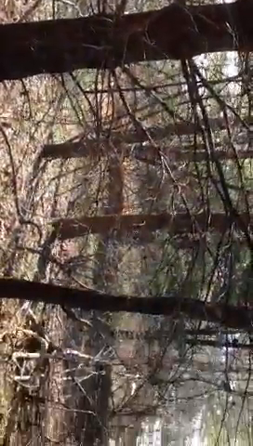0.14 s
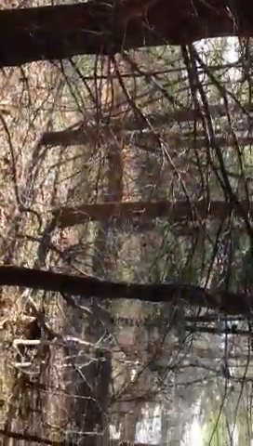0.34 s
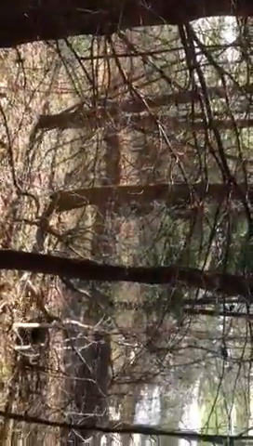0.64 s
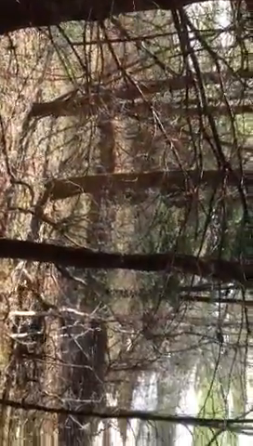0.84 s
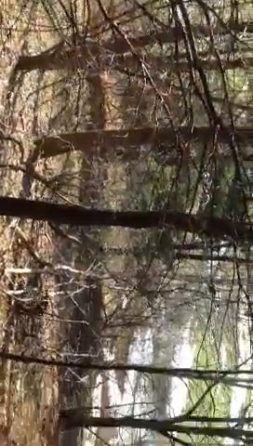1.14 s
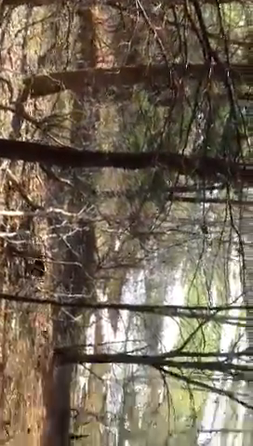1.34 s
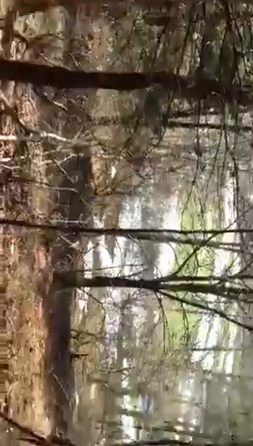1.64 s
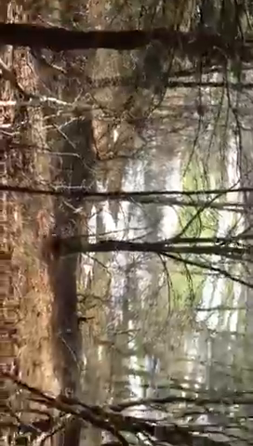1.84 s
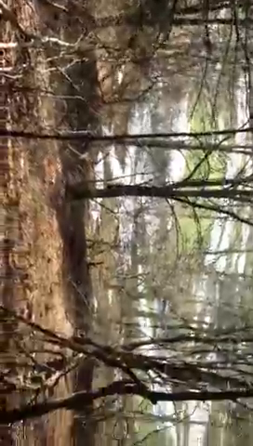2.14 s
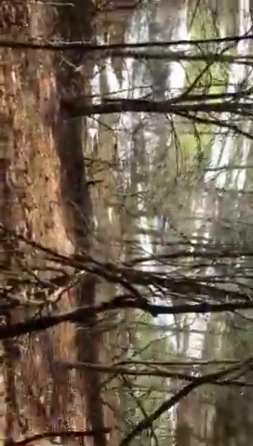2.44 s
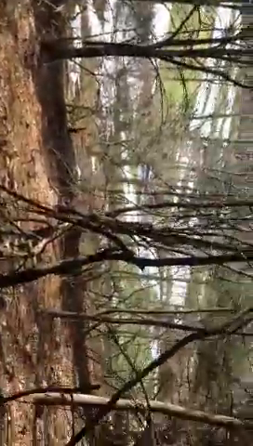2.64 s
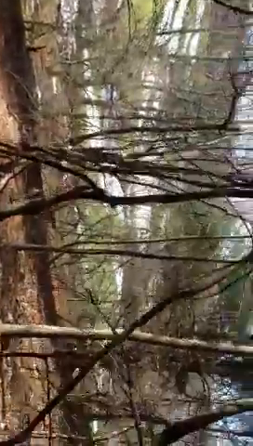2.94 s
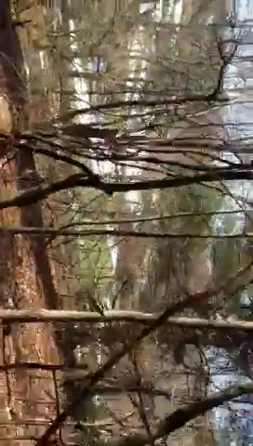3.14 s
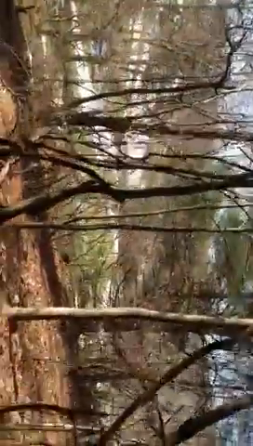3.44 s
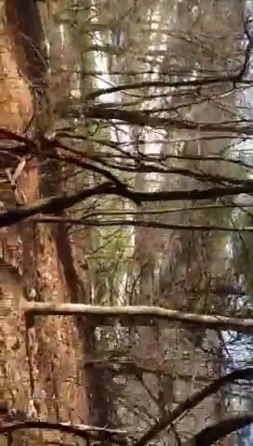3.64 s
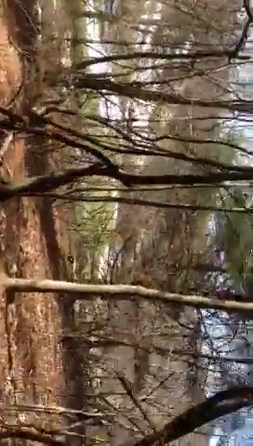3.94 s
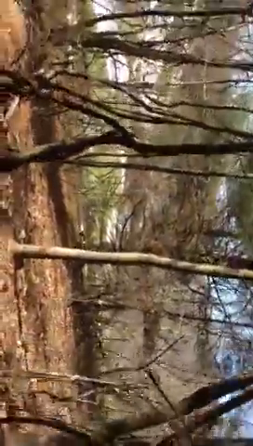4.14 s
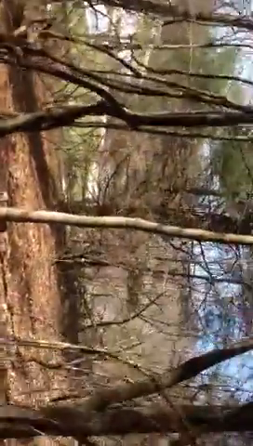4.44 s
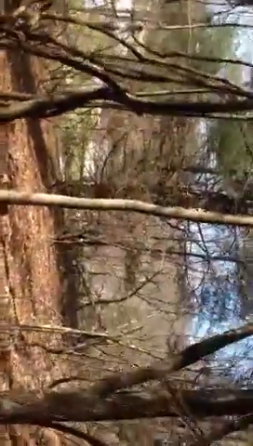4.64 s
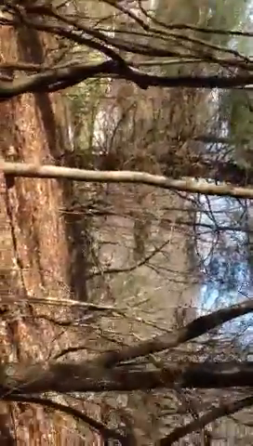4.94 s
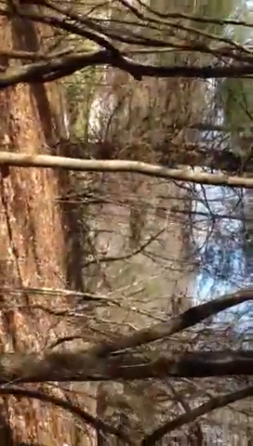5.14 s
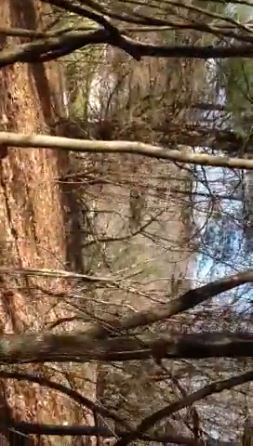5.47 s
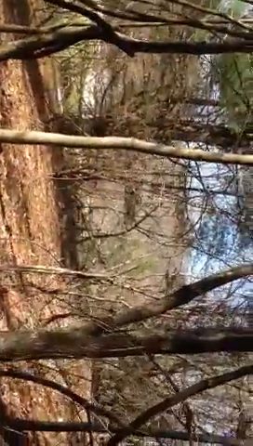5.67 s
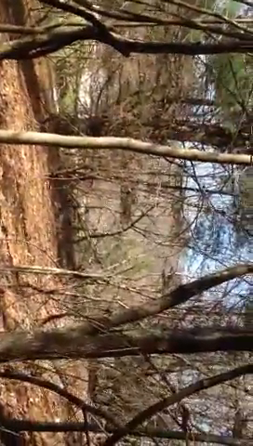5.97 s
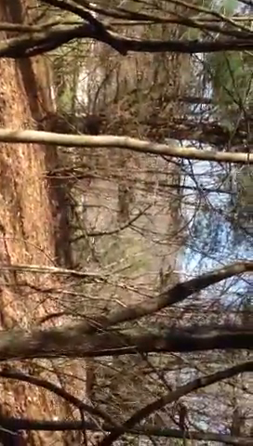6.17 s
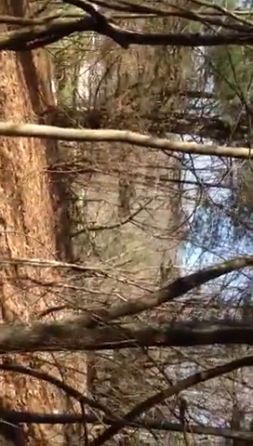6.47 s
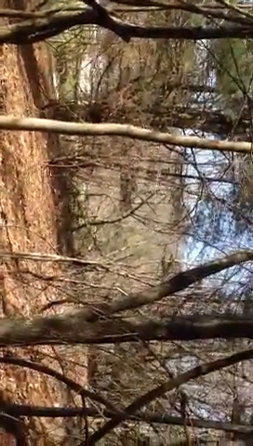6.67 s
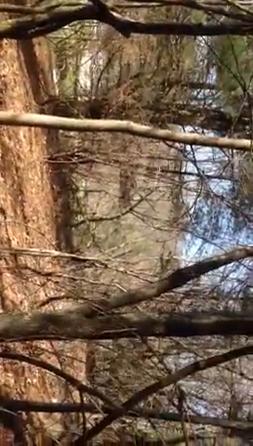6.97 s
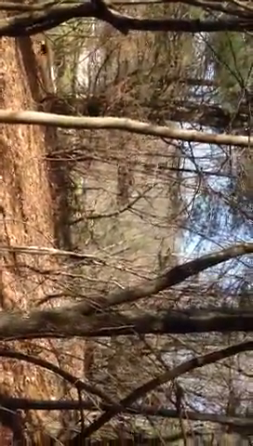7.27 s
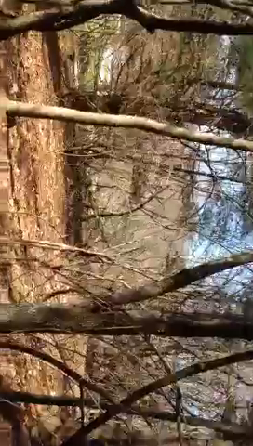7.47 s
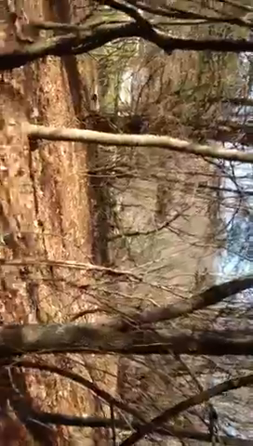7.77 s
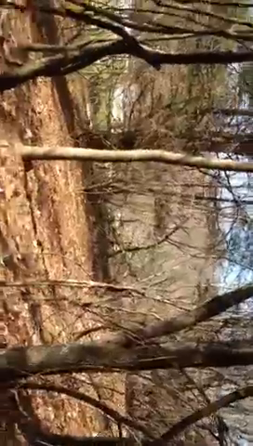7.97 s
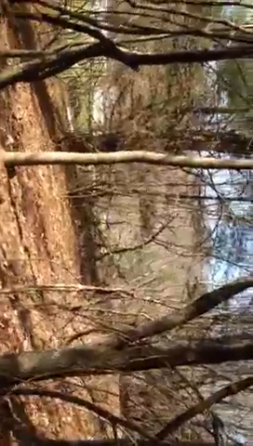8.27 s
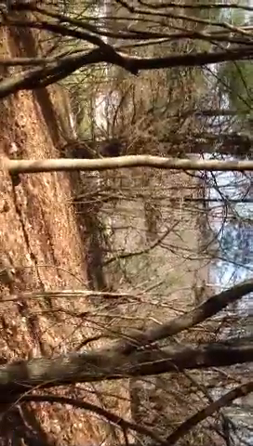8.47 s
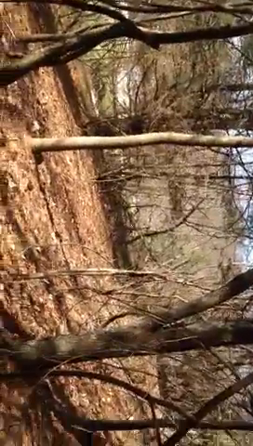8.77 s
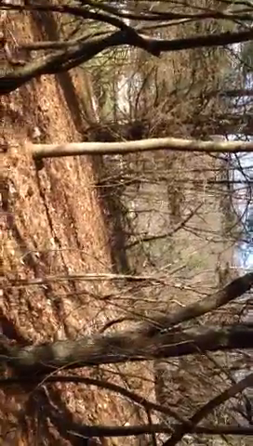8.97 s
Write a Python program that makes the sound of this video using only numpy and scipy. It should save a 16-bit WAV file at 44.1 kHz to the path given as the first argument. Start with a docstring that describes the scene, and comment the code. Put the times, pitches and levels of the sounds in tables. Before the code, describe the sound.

A small hand-held microphone outdoors picks up light leaf crunching, then overlapping high bays and rough barks from running hounds, with a diffuse woodland tail. Footfalls and twig cracks are loudest mid-way, then fade into faint rustles and soft hiss. Near the end come hard clicks and hollow knocks on the case, with a yelp turning into a deep, hoarse howl that trails off.

```python
"""Paws rustle through dry leaf litter in a quiet wood and twigs snap; then the running hounds bay.
High yelps are sums of partials; rough chest barks and one deep howl are pulses through resonances.
The trunks scatter each call into a soft tail of decaying noise; leaves are dense crackles and noise.
Fingers tap and rub the hand-held recorder's case: noise bursts, decaying sines and grainy noise."""
import sys
import numpy as np
from scipy import signal
from scipy.fft import rfft, irfft, next_fast_len
from scipy.io import wavfile
from scipy.ndimage import uniform_filter1d, map_coordinates

SR = 44100
rng = np.random.default_rng(int(sys.argv[2]) if len(sys.argv) > 2 else 0)


def wav_record(signal):
    """Record a signal, one row per channel, as 16-bit PCM in the file named by sys.argv[1]."""
    frames = np.transpose(np.atleast_2d(signal))
    bounded = np.clip(frames, -1, 1)
    # unit amplitude maps onto the largest positive 16-bit level
    quanta = np.round(bounded * 32767).astype(np.int16)
    wavfile.write(sys.argv[1], SR, quanta)


def gain_from_db(level_db):
    """Turn a decibel level (scalar or array-like) into a linear amplitude factor."""
    decades = np.asarray(level_db, float) / 20
    return 10 ** decades


N = 401751


def unit(x):
    """Scaled to rms 1."""
    return x / np.sqrt(np.mean(x ** 2) + 1e-20)


def along(points, hz):
    """Interpolates (hz, value) points on a log frequency axis."""
    point_hz, value = np.transpose(points)
    return np.interp(np.log(hz + 1), np.log(point_hz + 1), value)


def curves(rows):
    """A gate with 9 ms soft ends, then one value per sample for each column after the time."""
    time_s, *columns = np.transpose(rows)
    t = np.arange(N) / SR
    gate = np.clip(np.minimum(t - time_s[0], time_s[-1] - t) / 0.009 + 1, 0, 1)
    return [gate] + [np.interp(t, time_s, column) for column in columns]


def call(start_s, length_s, rise_s):
    """Time since a start, held at the end, and a gate that rises, holds and closes softly."""
    t = np.arange(N) / SR - start_s
    gate = np.clip(np.minimum(t / rise_s, (length_s - t) / 0.013 + 1), 0, 1)
    return np.clip(t, 0, length_s), gate


def wobble(rate_hz):
    """A smooth random curve through rate_hz random knots a second."""
    knots = rng.standard_normal(int(N * rate_hz / SR) + 4)
    return map_coordinates(knots, [np.arange(N) * rate_hz / SR])


def filtered(x, response):
    """x times a complex response of frequency."""
    m = next_fast_len(N + SR // 2)
    return irfft(rfft(x, m) * response(np.fft.rfftfreq(m, 1 / SR)), m)[:N]


def coloured(x, spectrum):
    """x shaped by a spectrum of (hz, db), rms 1."""
    return unit(filtered(x, lambda hz: gain_from_db(along(spectrum, hz))))


def throat(x, modes):
    """Parallel resonances of alternating sign, applied twice for steep skirts."""
    def one_pass(hz):
        total = 0
        for k, (centre_hz, width_hz, db) in enumerate(modes):
            damping = 1j * hz * width_hz
            total = total + (-1) ** k * gain_from_db(db / 2) * damping / (centre_hz ** 2 - hz ** 2 + damping)
        return total
    return filtered(x, lambda hz: one_pass(hz) ** 2)


def folds(pulse_hz, jitter, rough, uneven=0):
    """Vocal fold pulses of uneven timing and size, mixed with air noise let through once a cycle."""
    turns = np.cumsum(pulse_hz * (1 + jitter * wobble(120))) / SR
    # weak alternate pulses put lines halfway between the harmonics
    every_other = 1 - np.clip(uneven, 0, 1) * (np.floor(turns) % 2)
    pulses = np.diff(np.floor(turns), prepend=0) * gain_from_db(2.7 * rng.standard_normal(N)) * every_other
    breath = rng.standard_normal(N) * (1 + np.cos(2 * np.pi * turns))
    rough = np.clip(rough, 0, 1)
    return np.sqrt(1 - rough) * unit(pulses) + np.sqrt(rough) * unit(breath)


def yelps():
    """A thin, unsteady head voice: two strong partials and faint overtones, brighter on high notes."""
    # high bays, one curve a note: time_s, pitch_hz, first_partial_db
    notes = [
        [(2.135, 900, -57), (2.162, 1358, -40), (2.216, 1238, -27), (2.245, 1190, -45)],
        [(2.262, 1062, -35.5), (2.325, 1226, -34), (2.36, 1257, -30), (2.41, 1150, -33.5), (2.435, 1128, -37.5)],
        [(2.45, 1119, -29), (2.47, 1042, -24.5), (2.5, 1067, -32.5), (2.52, 1084, -38.5)],
        [(2.665, 1131, -53.5), (2.682, 1216, -34.5), (2.693, 1228, -20.5), (2.736, 1048, -28),
         (2.755, 1010, -38.5)],
        [(2.77, 1009, -37), (2.8, 1048, -39.5), (2.845, 1221, -32), (2.89, 1241, -54)],
        [(3.14, 997, -54), (3.158, 1127, -33), (3.19, 1069, -29), (3.215, 1099, -39), (3.25, 1070, -72),
         (3.3, 1070, -30)],
        [(3.35, 1195, -33.5), (3.37, 1205, -34.5), (3.41, 1053, -34.5), (3.47, 1060, -41), (3.534, 972.4, -34)],
        [(3.56, 1079, -39), (3.6, 1130, -33.5), (3.66, 1176, -35.5), (3.7, 1160, -45)],
        [(3.9, 1169, -50), (3.96, 1121, -33.5), (4.0, 1095, -43), (4.045, 1021, -48)],
        [(4.06, 1012, -45), (4.1, 1114, -39), (4.135, 1229, -38)],
        [(4.15, 1230, -39), (4.22, 1169, -39), (4.26, 1155, -35.5), (4.3, 1161, -36)],
        [(4.875, 972, -61), (4.91, 998, -54), (4.95, 985, -66)],
        [(7.85, 1490, -68), (7.858, 1502, -41.5), (7.878, 1556, -31.5), (7.905, 1324, -36.5), (7.94, 1160, -33),
         (7.96, 1150, -40)],
        [(8.395, 1262, -54), (8.455, 1177, -47)],
        [(8.47, 990, -47), (8.518, 1021, -41), (8.576, 1080, -41), (8.62, 1081, -45), (8.73, 1056, -48)],
    ]
    # second partial against the first as each note opens: second_db
    bright_db = [0, -4, -3.5, -3, -2, 1.5, -6.5, -7.5, -5, -4, -13, 7.5, -11.5, -19, -10]
    dulls_db, dulls_s = 10, 0.27  # the second partial sinks as the jaw slackens; time constant
    tight_db_per_octave = 5
    gate = np.minimum(sum(curves(rows)[0] for rows in notes), 1)
    t = np.arange(N) / SR
    starts_s = np.array([rows[0][0] for rows in notes])
    note = np.maximum(np.searchsorted(starts_s, t) - 1, 0)
    _, pitch_hz, first_db = curves(np.vstack(notes))
    octaves = np.log2(pitch_hz / 1150)
    dulled_db = dulls_db * (1 - np.exp(-np.maximum(t - starts_s[note], 0) / dulls_s))
    second_db = first_db + np.take(bright_db, note) - dulled_db + tight_db_per_octave * octaves
    phase = 2 * np.pi * np.cumsum(pitch_hz * (1 + 0.017 * wobble(150))) / SR
    first = gain_from_db(first_db + 4.1 * wobble(80)) * np.sin(phase)
    second = gain_from_db(second_db + 2.8 * wobble(80)) * np.sin(2 * phase)
    overtones = np.sin(3 * phase) + 0.5 * np.sin(4 * phase) + 0.5 * np.sin(5 * phase)
    overtones *= gain_from_db(second_db - 26.5 + 15 * octaves + 4.2 * wobble(60))
    return gate * (first + second + overtones)


def barks():
    """Chest notes that break in under the yelps: fold pulses in a throat, hoarser with effort."""
    # barks: start_s, length_s, first_hz, last_hz, level_db
    bark_rows = [(2.225, 0.052, 596, 603.5, -28), (2.44, 0.037, 681, 663, -42.5),
                 (2.709, 0.094, 603.4, 513, -41), (3.2, .09, 536, 532.1, -29),
                 (3.384, 0.049, 646.7, 616, -40), (3.442, 0.074, 580, 540, -31),
                 (3.531, 0.045, 604, 696.3, -36), (3.981, 0.12, 544.2, 536.6, -33),
                 (4.904, .04, 741, 716, -48)]
    # chest resonances: centre_hz, width_hz (of one pass), level_db
    chest = [(494, 204, -4.5), (954, 360, -1.5), (1770, 870, -8.5), (2476, 1040, -15)]
    rise_s, fade_db_per_s = 0.0086, 61
    pitch_points = []
    level = 0
    for start_s, length_s, first_hz, last_hz, db in bark_rows:
        pitch_points += [(start_s, first_hz), (start_s + length_s, last_hz)]
        t, gate = call(start_s, length_s, rise_s)
        level = level + gate * gain_from_db(db - fade_db_per_s * t)
    _, pitch_hz = curves(pitch_points)
    rough = 0.4 * (20 * np.log10(level + 1e-5) + 50) / 20
    voiced = throat(folds(pitch_hz, jitter=0.04, rough=rough), chest)
    low_cut = lambda hz: 1 / (1 + (400 / (hz + 1)) ** 8)
    return level * unit(filtered(voiced, low_cut))


def howl():
    """A raspy howl of paired pulses; the open mouth lifts the upper resonances and closes as it goes."""
    # one deep howl: time_s, pulse_pair_hz, level_db
    howl_rows = [(7.905, 292, -41), (7.937, 284.4, -33), (7.99, 290, -40), (8.03, 330, -36),
                 (8.19, 325.7, -36), (8.22, 326.4, -39), (8.245, 323.5, -46), (8.33, 341.6, -41.5),
                 (8.365, 326.2, -52), (8.44, 314.3, -48), (8.52, 333, -51.5)]
    # throat resonances, mouth shut and open: centre_hz, width_hz (of one pass), level_db
    mouth_shut = [(328, 233, -4), (630, 163, 8.5), (1025, 96, 14.5), (1670, 520, -11), (2900, 480, -21)]
    mouth_open = [(560, 575, -5.5), (1160, 176, 6), (1650, 216, 2.5), (2400, 350, -8.5), (2930, 230, -14),
                  (4945, 380, -28), (6250, 1600, -34)]
    opening_from, opening_to = 0.7, 0.23  # 0 shut, 1 open
    gate, pair_hz, db = curves(howl_rows)
    source = folds(2 * pair_hz, jitter=0.024, rough=0.16, uneven=0.58)
    _, closing = curves([(howl_rows[0][0], opening_from), (howl_rows[-1][0], opening_to)])
    opening = np.clip(closing + 0.097 * wobble(18), 0, 1)
    open_voice = unit(throat(source, mouth_open))
    shut_voice = unit(throat(source, mouth_shut))
    return gate * gain_from_db(db + 2.4 * wobble(40)) * (opening * open_voice + (1 - opening) * shut_voice)


def woods(x):
    """Scattering off trunks: a diffuse noise tail, drawn anew each quarter second as the hounds move."""
    # decay of the scattered sound: hz, t60_s
    trunks = [(300, 0.16), (1100, 0.93), (2500, 0.73), (6000, 0.65)]
    out, step, delay = np.zeros(N + 2 * SR), SR // 4, 300  # samples
    for start in range(0, N, step):
        hz, t, z = signal.stft(rng.standard_normal(SR), SR, nperseg=256)
        decay = gain_from_db(-60 * t / along(trunks, hz)[:, None])
        tail = signal.istft(z * decay, SR, nperseg=256)[1][:SR]
        piece = signal.fftconvolve(x[start:start + step], tail / np.linalg.norm(tail))
        out[start + delay:][:len(piece)] += piece
    return out[:N]


def crunch(spectrum, patchy_db):
    """Dense crackles over noise, in clumps and in patches of random colour."""
    sizes = gain_from_db(np.minimum(5 * rng.exponential(size=N), 12))
    crackles = (rng.random(N) < 2500 / SR) * rng.standard_normal(N) * sizes  # 2500 a second
    clumps = gain_from_db(0.58 * wobble(30) + 1.1 * wobble(120))
    grains = clumps * (0.58 * unit(crackles) + rng.standard_normal(N))
    z = signal.stft(grains, nperseg=256)[2]
    patches = uniform_filter1d(rng.standard_normal(z.shape), size=5, axis=0)
    patches = uniform_filter1d(patches, size=8, axis=1)
    patched = signal.istft(z * gain_from_db(patchy_db * unit(patches)), nperseg=256)[1][:N]
    return coloured(patched, spectrum)


def leaves():
    """Paws crush the crisp top leaves and, with more body, the deeper litter."""
    # the pack's steady rustle, by nearness: time_s, rustle_db, litter_lift_db
    rustle = [(0, -59, -1), (.45, -54.5, 2.5), (.6, -48, 0.5), (1.4, -47.5, 2.5), (1.65, -50.5, 0),
              (2.65, -53, 0), (2.85, -49, -2), (3.15, -39.5, -6.5), (3.45, -44, -1.5), (3.87, -45, -1.3),
              (4.1, -37, -1.5), (4.4, -37.5, -5), (4.68, -52.5, -0.5), (5.35, -52.5, -5.5),
              (5.75, -59.5, -1), (6.15, -53.5, -7), (6.6, -64.5, -3), (7.08, -70, -10.5),
              (7.7, -69.5, -0.5), (8.4, -66, 0), (8.53, -62.5, 5.5), (8.78, -73, 4)]
    # single footfalls that stand out: peak_s, peak_db, length_s
    footfalls = [(0.072, -50.5, 0.045), (0.295, -56, 0.031), (0.408, -51.5, 0.05), (0.537, -47.5, 0.031),
                 (1.06, -51, 0.038), (1.146, -43, 0.082), (1.284, -43.5, 0.095), (1.476, -46.5, 0.14),
                 (1.77, -49, .05), (2.0, -52.5, 0.041), (2.232, -46.5, 0.24), (3.007, -36.5, 0.13),
                 (3.081, -43.5, 0.051), (3.289, -26.5, 0.088), (3.597, -43.5, .1), (3.737, -40, 0.057),
                 (3.96, -37, .08), (4.039, -30.5, 0.072), (4.148, -40, 0.077), (4.301, -35.5, 0.08),
                 (4.484, -30.5, 0.16), (4.788, -46.5, .06), (4.897, -44, 0.054), (5.025, -43, 0.034),
                 (5.082, -46.5, 0.077), (5.184, -47.5, .06), (5.324, -54, 0.047), (5.39, -52.5, 0.056),
                 (5.8, -56.5, 0.041), (5.982, -50.5, 0.046), (6.125, -48, 0.036), (6.248, -54, .06),
                 (6.393, -52, 0.049), (6.53, -59, 0.08), (6.676, -64.5, 0.049), (6.832, -61.5, 0.12),
                 (7.293, -56, 0.18)]
    # spectra of top leaves and deeper litter: hz, level_db
    leaf_spectrum = [(1470, -45), (2500, -15), (3680, -11), (4410, -7), (5840, -2.5), (7220, -2),
                     (9710, -4), (13100, -0.5), (15300, -7)]
    litter_spectrum = [(35, -71), (60, -27.5), (128, -10.5), (184, -6), (259, -5), (328, -9.5), (506, -1),
                       (617, -3), (870, -8.5), (1100, -6), (2480, -1.5), (3690, -5), (4500, -8.5),
                       (5850, -31), (9900, -120)]
    rise_share = 0.45  # of a footfall's length, before its peak
    _, rustle_db, litter_db = curves(rustle)
    power = gain_from_db(rustle_db + 1.2 * wobble(16)) ** 2
    t = np.arange(N) / SR
    for peak_s, peak_db, length_s in footfalls:
        reach_s = length_s * np.where(t < peak_s, rise_share, 1 - rise_share)
        power = power + gain_from_db(peak_db - 7.8 * ((t - peak_s) / reach_s) ** 2) ** 2
    top_leaves = crunch(leaf_spectrum, patchy_db=1.24)
    litter = gain_from_db(litter_db - 5.5) * crunch(litter_spectrum, patchy_db=2.0)
    return np.sqrt(power) * (top_leaves + litter)


def snaps():
    """Short breaks: a noise crack of a millisecond or so over a brief sine ring."""
    # twigs and crisp leaves: start_s, crack_db, ring_hz, ring_db
    breaks = [(0.535, -27, 2660, -49), (1.1308, -22.5, 2930, -41), (1.271, -31.5, 2500, -32),
              (2.9348, -24.5, 2600, -30.5), (2.9731, -25.5, 2320, -49), (3.0628, -26, 1312, -39),
              (3.0769, -12, 1797, -32), (3.101, -18, 3500, -43), (3.1305, -16, 3630, -32),
              (3.1606, -26.5, 1800, -35.5), (3.9931, -14, 2048, -40), (4.151, -10.5, 1316, -31),
              (4.1631, -17, 1296, -18), (4.276, -20.5, 3620, -31), (4.519, -18.5, 3195, -35),
              (4.7882, -24.5, 3000, -51), (5.298, -34, 1480, -35.5), (5.898, -31.5, 2900, -51)]
    out, t = np.zeros(N + SR), np.arange(512) / SR
    for start_s, crack_db, ring_hz, ring_db in breaks:
        ring = gain_from_db(ring_db - 60 * t / 0.01) * np.sin(2 * np.pi * ring_hz * t)
        crack = gain_from_db(crack_db - 60 * t / 0.002083) * np.sign(rng.standard_normal(len(t)))
        out[round(start_s * SR):][:len(t)] += ring + crack
    return filtered(out[:N], lambda hz: (1j * hz / (700 + 1j * hz)) ** 2)


def taps():
    """Each tap is a short noise crack, a hollow knock of the case and a push on the diaphragm."""
    # taps on the case: start_s, crack_db, knock_db, knock_hz, thump_db, thump_hz
    tap_rows = [(7.3587, -61, -45, 400, -34, 307), (7.3738, -12, -15.5, 734, -22, 355),
                (7.3814, -32, -18, 750, -23, 333), (7.4692, -45.5, -17, 660, -62, 212),
                (7.4885, -45, -40, 490, -57, 261), (7.551, -50.5, -73, 404, -36, 210),
                (7.646, -59, -48, 618, -71.5, 302), (7.921, -14.5, -15, 510, -42, 343),
                (8.3858, -21, -16, 513, -33, 260), (8.4293, -48, -45, 624, -30, 260),
                (8.81, -15.5, -14.5, 370, -13, 222), (9.0444, -24.5, -21, 603, -21.5, 206)]
    # crack spectrum: hz, level_db
    crack_spectrum = [(590, -4), (1000, -6), (2180, -2.5), (3150, -11), (4340, -22), (6950, -5.5),
                      (8160, -9.5), (9690, -25.5), (11600, -5.5), (13700, -24), (15500, -30)]
    out, t = np.zeros(N + SR), np.arange(2048) / SR
    sharp = coloured(rng.standard_normal(N), crack_spectrum)
    # half-millisecond burst with a faint tail
    burst = (t / 0.00049) * np.exp(1 - t / 0.0005) + 0.126 * gain_from_db(-60 * t / 0.023)
    for start_s, crack_db, knock_db, knock_hz, thump_db, thump_hz in tap_rows:
        at = round(start_s * SR)
        crack = gain_from_db(crack_db - 2.5) * burst * unit(sharp[at:at + len(t)])
        knock = gain_from_db(knock_db - 60 * t / 0.012) * np.sin(2 * np.pi * knock_hz * t)
        knock *= 1 - np.exp(-t / 0.00035)
        thump = gain_from_db(thump_db - 60 * t / 0.017) * np.sin(2 * np.pi * thump_hz * t)
        thump *= 1 - np.exp(-t / 0.00072)
        out[at:at + len(t)] += crack + knock + thump
    return filtered(out[:N], lambda hz: (1j * hz / (90 + 1j * hz)) ** 3)


def rubs():
    """Skin friction: grainy noise under each stroke of a finger on the case."""
    # strokes: start_s, length_s, level_db
    strokes = [(7.384, .085, -43.5), (7.474, 0.032, -56), (7.773, 0.05, -57.5)]
    # friction spectrum: hz, level_db
    skin_spectrum = [(88, -40.5), (150, -16), (332, 0), (781, -1), (1420, -9), (3410, -5.5), (4650, -22),
                     (6860, -13.5), (14100, -18), (15500, -36)]
    level = sum(gain_from_db(db) * call(start_s, length_s, 0.0071)[1] for start_s, length_s, db in strokes)
    return level * gain_from_db(2.6 * wobble(390)) * coloured(rng.standard_normal(N), skin_spectrum)


def air():
    """The still wood and the microphone's hiss: coloured noise of slowly wandering level."""
    # background spectrum: hz, level_db
    air_spectrum = [(15, -63), (25, -40), (69, -13.5), (86, -6), (143, -3.5), (192, -2.5), (288, -7),
                    (320, -4.5), (366, -6.5), (397, -5), (661, -11.5), (1370, -17), (15300, -19.5)]
    level_db = -64 + 0.8 * wobble(1.887)
    return gain_from_db(level_db) * coloured(rng.standard_normal(N), air_spectrum)


def scene():
    """Sums all layers; the voices alone feed the scattered tail."""
    voices = yelps() + barks() + howl()
    calls = gain_from_db(2.0) * voices + gain_from_db(-3.5) * woods(voices)
    return (calls + leaves() + snaps() + taps() + rubs() + air())[None]


def band_limit(x):
    """A steep low-pass at the top of the band."""
    return signal.sosfilt(signal.butter(12, 16560, fs=SR, output="sos"), x)


def record(dry):
    """The small microphone drops the bass and the top treble."""
    bass_cut = lambda hz: (1j * hz / (90 + 1j * hz)) ** 3
    top_cut = lambda hz: np.where(hz < 15300, 1, gain_from_db(-27.5))
    mix = filtered(dry[0], lambda hz: bass_cut(hz) * top_cut(hz))[None]
    return band_limit(mix)


dry = scene()
out = record(dry)
wav_record(out)
```